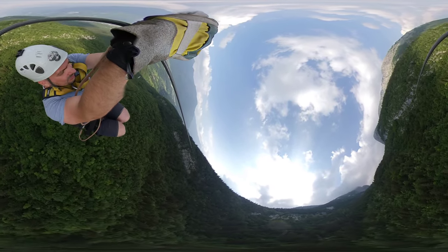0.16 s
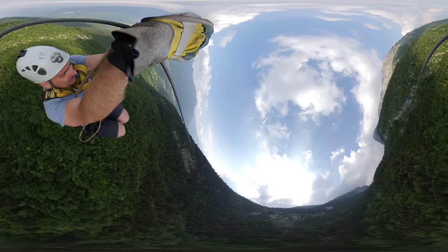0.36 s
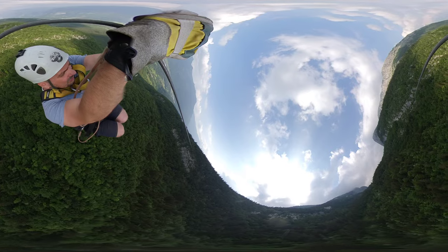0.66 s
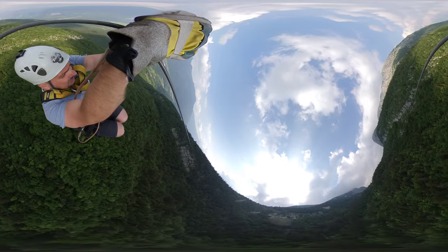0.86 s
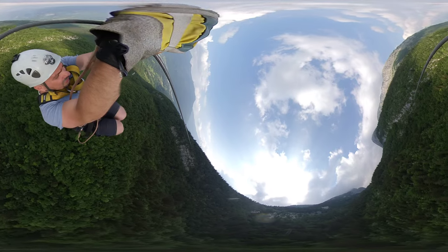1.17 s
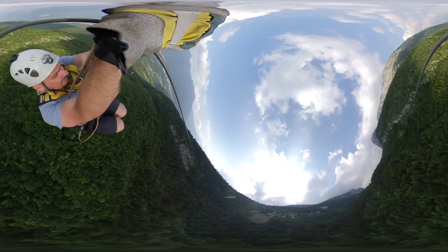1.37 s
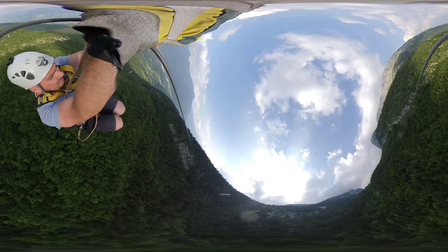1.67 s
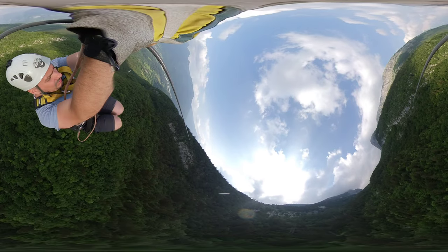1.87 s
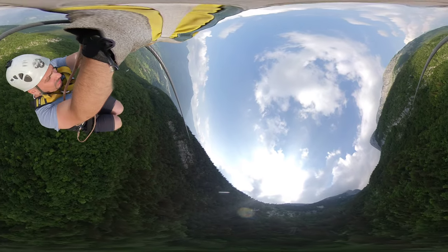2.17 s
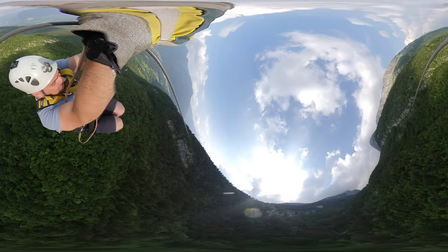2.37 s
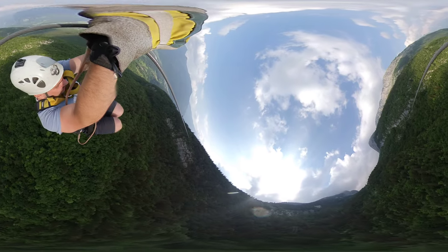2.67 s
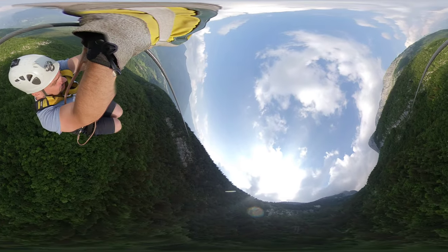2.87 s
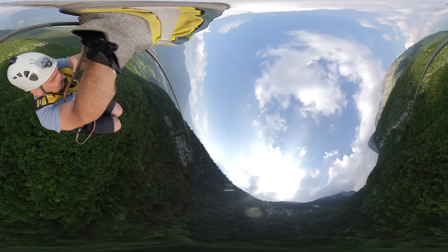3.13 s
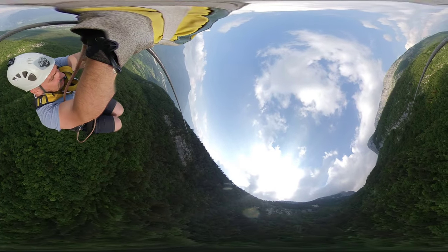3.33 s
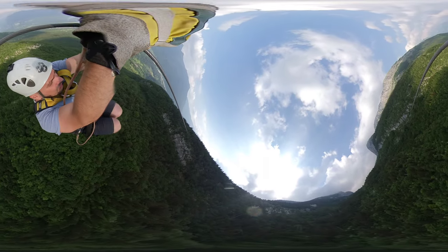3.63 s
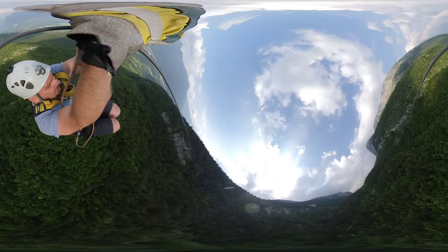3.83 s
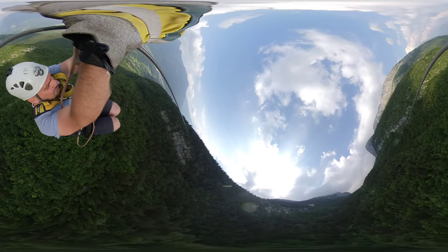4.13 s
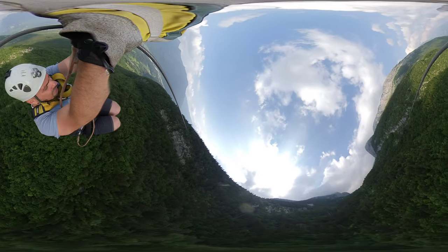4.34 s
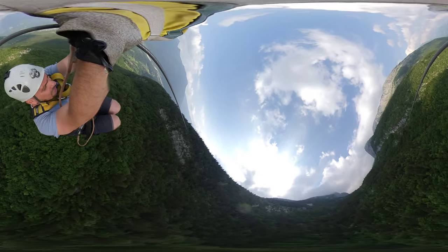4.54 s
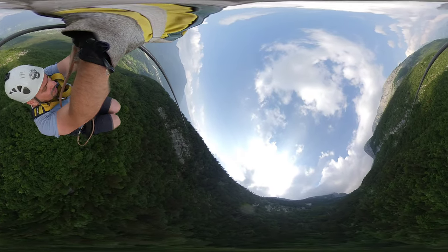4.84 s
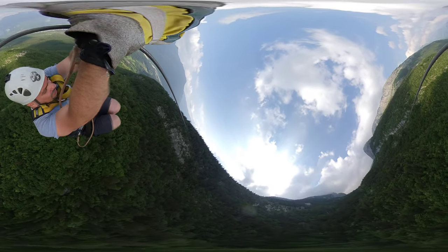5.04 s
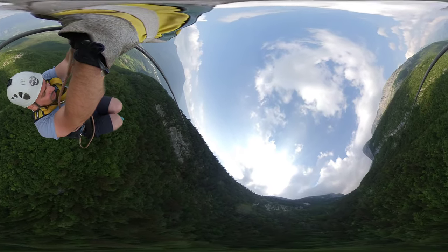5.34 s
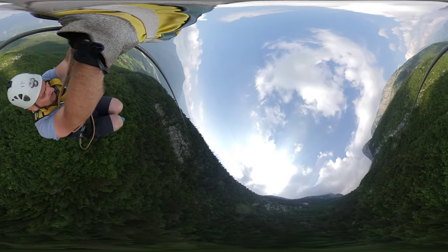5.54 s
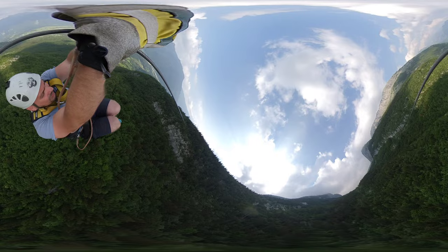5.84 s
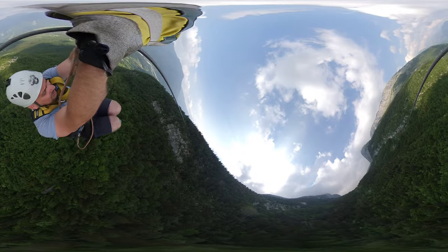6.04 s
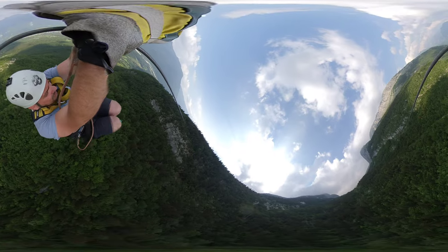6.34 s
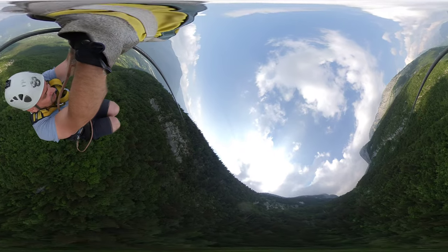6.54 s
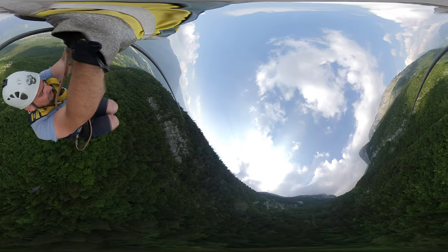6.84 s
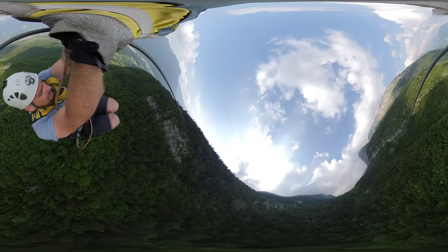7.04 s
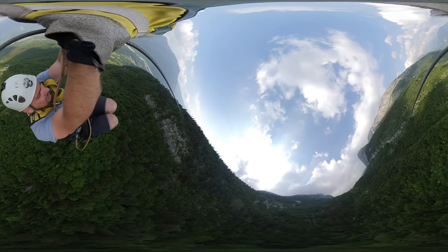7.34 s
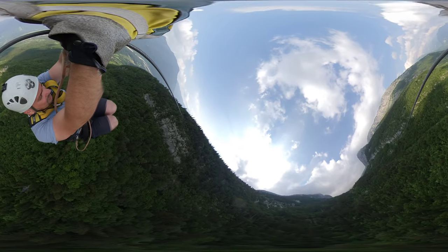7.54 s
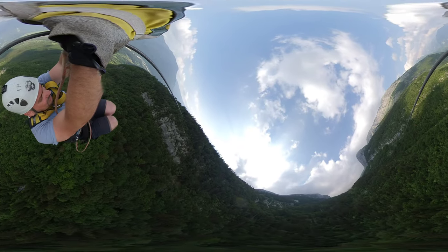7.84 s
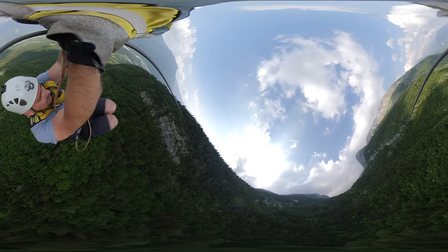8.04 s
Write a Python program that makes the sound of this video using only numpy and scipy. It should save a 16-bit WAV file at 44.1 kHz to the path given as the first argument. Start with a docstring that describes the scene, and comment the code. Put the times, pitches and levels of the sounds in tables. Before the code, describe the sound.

Continuous close zipline ride outdoors: wheels bump over cable strands so quickly that they make a rough, high whine with shimmering overtones. The metal frame rings as dense, sizzling noise, with a grinding roar beneath. The pitch droops gently in the second half. Irregular wind flutter and short soft thumps strike each side separately, stronger at left, with airy hiss on top. It neither starts nor stops.

```python
"""Cable trolley in a head wind

A trolley rolls fast along a steel cable above a hand-held two-port camera. Its wheels bump over the twisted
strands: a bank of sines whose pitch sinks as the ride slows. Rolling noise rings the metal frame (resonant
filters) and roars below it (patchy noise). The head wind buffets each port on its own, as lumpy noise, air hiss
and single-cycle pops, mostly in the left one."""
import sys
import numpy as np
from scipy import signal
from scipy.fft import rfft, irfft, next_fast_len
from scipy.io import wavfile
from scipy.ndimage import uniform_filter1d, map_coordinates

SR = 44100
rng = np.random.default_rng(int(sys.argv[2]) if len(sys.argv) > 2 else 0)


def boost(x):
    """Linear amplitude factor 10**(x/20) for a level x in decibels (scalar or array-like)."""
    u = np.asarray(x, float) / 20
    return 10 ** u


def generate_wav(signal):
    """Clip the signal to [-1, 1] and save it as 16-bit WAV at the path in sys.argv[1]."""
    frames = np.transpose(np.atleast_2d(signal))
    scaled = np.clip(frames, -1, 1) * 32767
    pcm = np.round(scaled).astype(np.int16)
    wavfile.write(sys.argv[1], SR, pcm)


N = 361619

# strands passing under the wheels: t/s, rate f/Hz
STRAND_RATES = [(0, 1097), (.3, 1092), (.55, 1098), (1.05, 1089), (1.5, 1099), (1.95, 1086), (2.3, 1084),
                (3.05, 1083), (3.3, 1075), (4.25, 1080), (4.45, 1063), (4.75, 1058), (4.93, 1066),
                (5.25, 1055), (5.65, 1056), (5.8, 1060), (5.97, 1040), (6.7, 1035), (7, 1024), (7.35, 1020),
                (7.75, 1007), (8.2, 992)]
SIDE = np.array([[.5], [-.5]])  # shares a left-right difference between the ports


def unit(x):
    """Scaled to rms 1 along time."""
    return x / np.sqrt(np.mean(x ** 2, axis=-1, keepdims=True) + 1e-20)


def along(points, hz):
    """(f/Hz, value) points read on a log frequency axis."""
    f, v = np.transpose(points)
    return np.interp(np.log(hz + 1), np.log(f + 1), v)


def curves(rows):
    """One value per sample for each column after the time."""
    s, *cols = np.transpose(rows)
    return np.array([np.interp(np.arange(N) / SR, s, c) for c in cols])


def wobble(rate_hz):
    """A smooth random curve, rate_hz knots a second (at most 400)."""
    knots = rng.standard_normal(int(N * 400 / SR))
    return map_coordinates(knots, [np.arange(N) * rate_hz / SR])


def filtered(x, response):
    """x times a complex response of frequency."""
    m = next_fast_len(N + 8192)
    return irfft(rfft(x, m) * response(np.fft.rfftfreq(m, 1 / SR)), m)[..., :N]


def patches():
    """A random field over frequency and time, smooth over some hundred Hz and some tens of ms."""
    field = rng.standard_normal((257, N // 256 + 2))
    return unit(uniform_filter1d(uniform_filter1d(field, size=9, axis=0), size=7, axis=1))


def rush(spectrum, patchy_db, alike=0, lag_s=0, bend_rad=0):
    """Patchy noise of rms 1; the share alike reaches both ports, left later, its left-right phase patchy too."""
    hz, _, z = signal.stft(rng.standard_normal((3, N)), SR, nperseg=512)
    frames = z.shape[2]
    lead = bend_rad * patches()[:, :frames] - 2 * np.pi * lag_s * hz[:, None]
    alike = alike / (1 + (lag_s * hz[:, None] / 1.64) ** 6)  # a lagged shared part fades out in the treble
    shared = z[2] * np.exp(.5j * np.array([lead, -lead]))
    ports = np.sqrt(1 - alike) * z[:2] + np.sqrt(alike) * shared
    ports = ports * boost(patchy_db * patches()[:, :frames])
    pair = signal.istft(ports, nperseg=512)[1][:, :N]
    return unit(filtered(pair, lambda hz: boost(along(spectrum, hz))))


def slowing():
    """How far the strand rate lies below the full-speed 1090 Hz, in hundreds of Hz."""
    return (1090 - curves(STRAND_RATES)[0]) / 100


def swells_db(rows, which):
    """Bell-shaped rises and dips in dB from the rows that name this line or resonance."""
    t = np.arange(N) / SR
    return sum(db * np.exp(-(2 * (t - s) / length_s) ** 2)
               for s, length_s, name, db in rows if round(2 * name) == 2 * which)


def whine():
    """Multiples of the strand rate; alternate strands sit unevenly, which adds lines halfway between."""
    # lines: multiple of strand rate, level/dB at full speed, level gain/dB per 100 Hz of slowing,
    # left-right/dB, left lead/rad at full speed, lead gain/rad per 100 Hz of slowing
    orders = [(1, -26, 4.5, 0.5, -2.1, 0.2), (1.5, -38.5, -1, 0.6, -3.1, 0), (2, -31, -3, 0, 0, 0),
              (2.5, -39, -3, -1.6, -0.7, 0), (3, -28.5, -3, 0, 0, 0), (3.5, -39.5, -1, 0.1, -0.2, 0),
              (4, -36, 0, 1.8, -3.3, 3), (4.5, -38, -1, -5.0, 2.3, 0), (5, -38, -1, -2.5, 0.5, 0),
              (5.5, -38, -1, 0.7, -1.6, 0), (6, -32, -4, 1.5, -1.6, 0)]
    # 2nd line swells and wanders between ports: t/s, left/dB and right/dB over its rule, added left lead/rad
    second = [(0, 3, -1, 1), (.5, 3, -4, .9), (.95, 3, 6, 1.7), (1.2, 2, 0, 1.3), (1.5, -1, -1, 3),
              (2.3, 1, -1, 3), (2.5, 0, -4, .4), (3.1, -2, -4, 0), (3.55, 0, 6, 1.5), (3.9, -2, -12, .5),
              (4.5, -1, -4, -2.9), (5.4, 5, -3, -1.6), (5.8, 3, -12, -2.6), (6.4, 0, 6, -4.6),
              (7.1, 2, 2, -6.3), (7.7, -6, 0, -5.2), (8.2, -6, 3, -4.9)]
    # 3rd line likewise: t/s, left/dB and right/dB over its rule, added left lead/rad
    third = [(0, 0, 0, -2.4), (.9, -1, -5, -3), (1.3, -2, 2, -2.8), (1.6, -2, 0, -1.2), (2.1, 0, 0, -.9),
             (2.45, -7, 0, -3.1), (3.3, 0, -1, -4), (4, -6, 0, -3), (4.35, -9, 2, -.7), (5, -10, 0, -1.5),
             (5.6, -7, 3, -1.5), (6.2, 1, -2, -5), (7.3, -2, 1, -4.7), (7.8, 6, 0, -5.5),
             (8.2, 5, -1, -5.6)]
    # momentary swells: middle t/s, length/s, multiple, level/dB
    line_swells = [(.35, 1, 6, 6), (.9, .6, 4, 2), (.9, .4, 3.5, 11.5), (1.9, .6, 4, 9), (1.95, 0.53, 1, 2),
                   (3.0, 0.48, 6, 6), (3.3, .7, 4, 6), (3.55, 0.63, 3.5, 11.5), (5.3, 0.59, 3.5, 8),
                   (6.3, 0.72, 1.5, 5), (6.45, 0.64, 4, 10), (7.1, 0.74, 1, 2.5), (7.3, 2.4, 5, 7),
                   (7.7, 0.61, 4, 6.5), (8.1, .7, 6, 4.5)]
    unsteady_hz = 4  # random unsteadiness of the strand rate
    rate_hz = curves(STRAND_RATES)[0] + unsteady_hz * wobble(11)
    turn = 2 * np.pi * np.cumsum(rate_hz) / SR + 0.14 * wobble(40)
    wander = {2: curves(second), 3: curves(third)}
    slow = slowing()
    out = np.zeros((2, N))
    for multiple, level_db, grows_db, pan_db, lead, lead_grows in orders:
        flutter_db = (.5 + 0.45 * multiple) * wobble(25)  # higher lines are less steady
        if multiple % 1 or multiple == 5:
            flutter_db += 2.4 * wobble(7) + wobble(2)  # the halfway lines and the 5th come and go in bursts
        elif multiple > 3:
            flutter_db += 1.5 * wobble(2.5)  # the other upper lines drift slowly
        *wander_db, swing = wander.get(multiple, np.zeros((3, 1)))
        smear = 0.058 * multiple * wobble(60) + rng.uniform(0, 2 * np.pi)
        line_db = level_db + grows_db * slow + flutter_db + swells_db(line_swells, multiple)
        port_db = line_db + np.array(wander_db) + SIDE * pan_db
        port_phase = SIDE * (lead + lead_grows * slow + swing)
        out += np.sqrt(2) * boost(port_db) * np.sin(multiple * turn + smear + port_phase)
    return out


def frame():
    """Rolling noise rings each resonance; part reaches both ports alike, with an unsteady lead on one side."""
    # wheel and frame resonances: f/Hz, width at half amplitude f/Hz, left-right/dB, left lead/rad, likeness 0-1
    resonances = [(5940, 640, -0.5, -0.86, 0.53), (6577, 880, 3.5, -1.27, .45),
                  (7820, 1500, -2.5, -0.73, 0.3), (9130, 900, 4, 0.57, 0.1), (11590, 650, 4, -0.41, 0.1)]
    # same order: level/dB at full speed, level gain/dB per 100 Hz of slowing, slow unsteadiness/dB
    ringing = [(-28.5, 5.5, 0.6), (-23, 3.5, .8), (-17.5, -2.5, 1.06), (-23, -2, 0.9), (-31.5, -3.5, 3)]
    # temporary swells and fades: middle t/s, length/s, resonance number from 0, level/dB
    ring_swells = [(.25, .8, 3, 2), (0.95, 0.45, 0, 7), (1.1, 0.61, 2, -4.5), (1.1, 0.401, 3, 4),
                   (1.904, 1.1, 4, 2), (1.9, 1.14, 2, 2), (1.6, .8, 3, -6), (4.6, 1.6, 3, 4),
                   (4.49, 0.94, 1, 2), (3.55, .8, 2, -1.5), (5.2, .8, 2, 1.5), (5.95, .9, 3, -5),
                   (5.4, 1.2, 4, -5), (6.01, .9, 0, 6.5), (6.46, 0.51, 1, 2), (7.3, 0.69, 0, 4),
                   (7.9, .8, 1, 3)]
    out = np.zeros((2, N))
    slow = slowing()
    flicker_db = 0.67 * wobble(30)  # random level flicker common to all resonances
    quarter = np.array([[1], [1], [1], [-1j]])  # two own noises, a shared one and its quarter-cycle twin
    for k, (hz, width_hz, pan_db, lead, alike) in enumerate(resonances):
        level_db, grows_db, unsteady_db = ringing[k]
        drive = rng.standard_normal((3, N))[[0, 1, 2, 2]]
        ring = unit(filtered(drive, lambda f: quarter / (1 + (2 * (f - hz) / width_hz) ** 2)))
        turn = SIDE * (lead + 1.0 * wobble(20))
        shared = ring[2] * np.cos(turn) - ring[3] * np.sin(turn)
        ring_db = level_db + grows_db * slow + swells_db(ring_swells, k)
        ring_db = ring_db + unsteady_db * wobble(2.53) + flicker_db + 0.72 * wobble(12)
        mixed = np.sqrt(alike) * shared + np.sqrt(1 - alike) * ring[:2]
        out += boost(ring_db + SIDE * pan_db) * mixed
    return out


def roar():
    """Broad noise of steel wheels on steel under the resonances, a little louder at the right port."""
    # relative spectrum: f/Hz, level/dB per Hz
    roar_spectrum = [(900, -28), (1300, -7), (2000, -6), (2800, -4), (3600, 0.5), (4500, -2), (5000, 3),
                     (5500, -0.5), (7000, -2.5), (9700, -7), (10400, 4), (11000, -5), (13000, -27.5)]
    rolling = rush(roar_spectrum, patchy_db=1.3, alike=.55, lag_s=.00034, bend_rad=.8)
    return boost(np.array([[-17.8], [-16.3]]) + 0.31 * wobble(8)) * rolling


def wind():
    """Lumpy buffeting with single-cycle pops, mostly on the exposed left port, and a flickering air hiss."""
    # relative buffeting spectrum: f/Hz, level/dB per Hz
    buffet_spectrum = [(25, -30), (90, -39), (200, -15), (420, -1.5), (900, 1.5), (1500, -4.5), (3000, -40),
                       (6000, -125)]
    # relative hiss spectrum: f/Hz, level/dB per Hz
    air_spectrum = [(6000, -29.5), (10000, -12.5), (12000, 4), (14000, 4.5), (15800, 3.5)]
    # some single left pops: t/s, peak level/dB ahead of the wind filter
    single_pops = [(0.323, -9), (1.952, -13), (2.208, -10), (2.831, -10.5), (4.008, -10), (4.418, -12),
                   (4.456, -12), (4.848, -15), (6.15, -22), (6.317, -11), (6.96, -9), (7.025, -12),
                   (7.771, -9)]
    # gusts reach each port at their own time
    gust_db = 1.5 * np.array([wobble(2.69), wobble(3.16)])
    level = boost(-32.5 + gust_db)
    lumps_db = np.array([1.06 * wobble(45) + 2.3 * wobble(12), 2.9 * wobble(45) + 0.67 * wobble(11)])
    buffet = level * unit(boost(lumps_db) * rush(buffet_spectrum, patchy_db=1.3))
    buffet[0] = filtered(buffet[0], lambda hz: 1 + 1.55 / (1 + ((hz - 170) / 70) ** 2))  # left port booms

    when, size = rng.random((2, 2, N))
    blow_db = np.array([[4], [1.5]]) - 3.7 * np.log(size + 0.035)  # many small eddies, few large
    blows = level * (when < 90 / SR) * boost(blow_db)  # about 90 a second at each port
    for s, peak_db in single_pops:
        blows[0, round(s * SR)] = boost(peak_db)
    u = np.arange(-150, 150) / SR * 2 * np.pi * 600
    push_pull = -u * np.exp(.5 - u * u / 2)  # an eddy pushes, then pulls
    pops = signal.fftconvolve(blows, [push_pull], "same", axes=1)
    pops = filtered(pops, lambda hz: (1j * hz / (180 + 1j * hz)) ** 2)  # the camera's wind filter

    air_db = -21 + 0.1 * wobble(2.8) + 0.37 * wobble(4.6) + np.array([[1.5], [-1.5]])
    air = boost(air_db) * rush(air_spectrum, patchy_db=2.0, alike=0.12, bend_rad=1.9)
    return buffet + pops + air


def scene():
    """Trolley and wind at the two ports."""
    return whine() + frame() + roar() + wind()


def folded(x, least_alike, fold_hz):
    """Intensity stereo: treble bands alike enough become one signal, in or out of phase on the two sides."""
    frames = dict(fs=SR, window="cosine", nperseg=2048, noverlap=1024)
    lead_in = 717  # samples, sets the frame grid
    hz, _, z = signal.stft(np.pad(x, ((0, 0), (lead_in, 0))), **frames)
    bands = z[:, :-1].reshape(2, 32, 32, -1)  # port, band, bin, frame
    power = np.sum(np.abs(bands) ** 2, axis=2, keepdims=True) + 1e-20
    cross = np.sum(bands[0] * bands[1].conj(), axis=1, keepdims=True).real
    alike = cross / np.sqrt(power[0] * power[1])
    both = bands[0] + np.sign(alike) * bands[1]
    both_power = np.sum(np.abs(both) ** 2, axis=1, keepdims=True) + 1e-20
    left = both * np.sqrt(power[0] / both_power)
    steps = np.round(2 * np.log2(power[1] / power[0]))  # the balance is kept in steps of 1.5 dB
    pair = np.array([left, np.sign(alike) * left * 2 ** (steps / 4)])
    band_hz = hz[:-1].reshape(32, 32, 1)[:, :1]
    chosen = (np.abs(alike) > least_alike) & (band_hz > fold_hz)
    z[:, :-1] = np.where(chosen, pair, bands).reshape(z[:, :-1].shape)
    return signal.istft(z, **frames)[1][:, lead_in:lead_in + N]


def top_cut(x):
    """Nothing passes above the cut-off."""
    return signal.sosfilt(signal.butter(12, 16870, fs=SR, output="sos"), x)


def record(dry):
    """Loud peaks are rounded off, all above 15.8 kHz is cut, then the treble is folded."""
    rounded = dry / (1 + np.abs(dry) ** 30) ** (1 / 30)
    limited = filtered(rounded, lambda hz: hz < 15800)
    mix = folded(limited, least_alike=0.096, fold_hz=6880)
    return top_cut(mix)


dry = scene()
out = record(dry)
generate_wav(out)
```